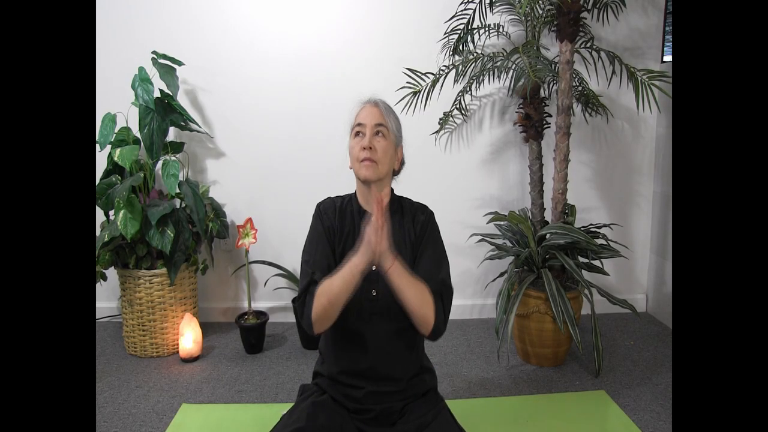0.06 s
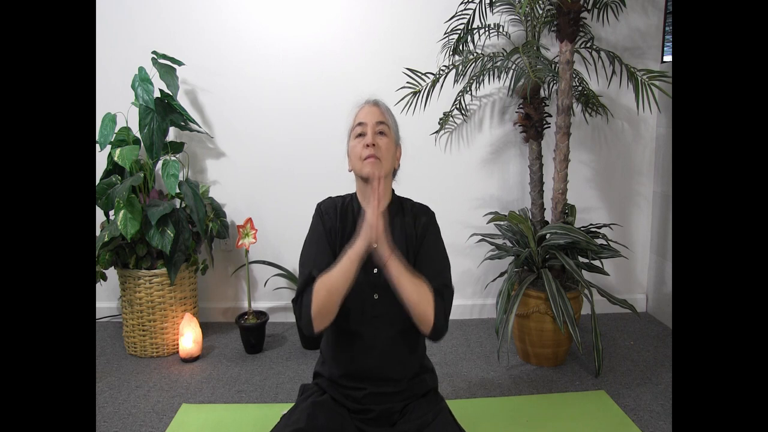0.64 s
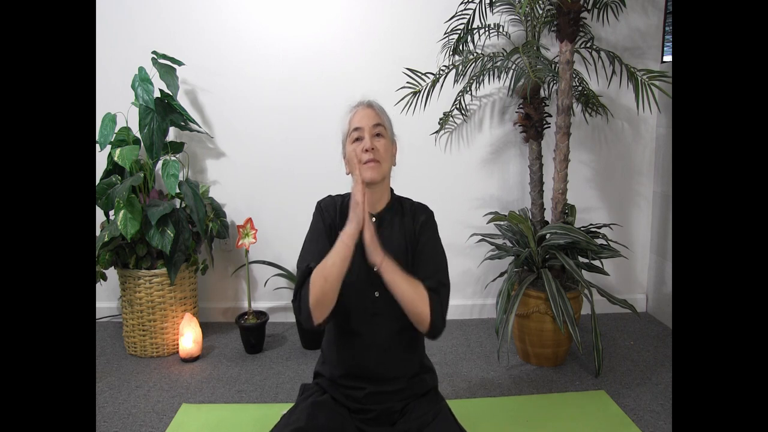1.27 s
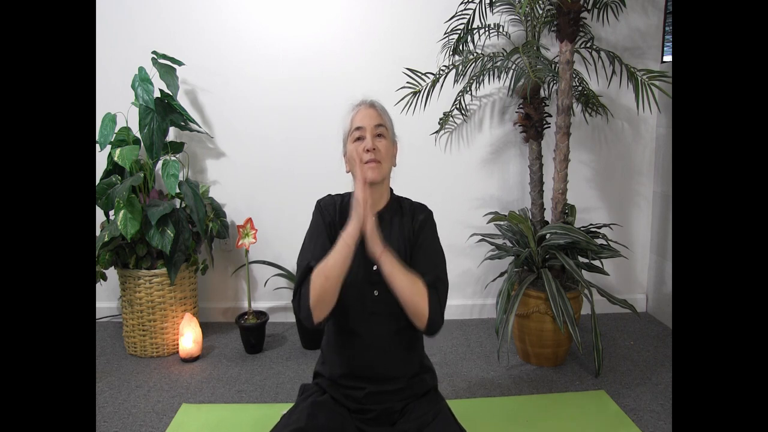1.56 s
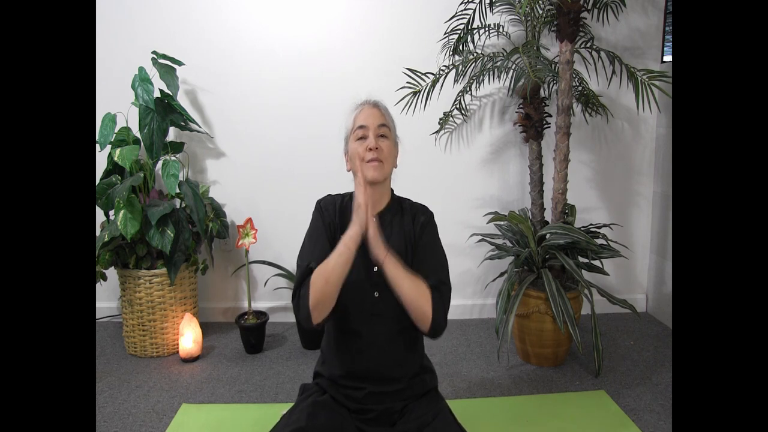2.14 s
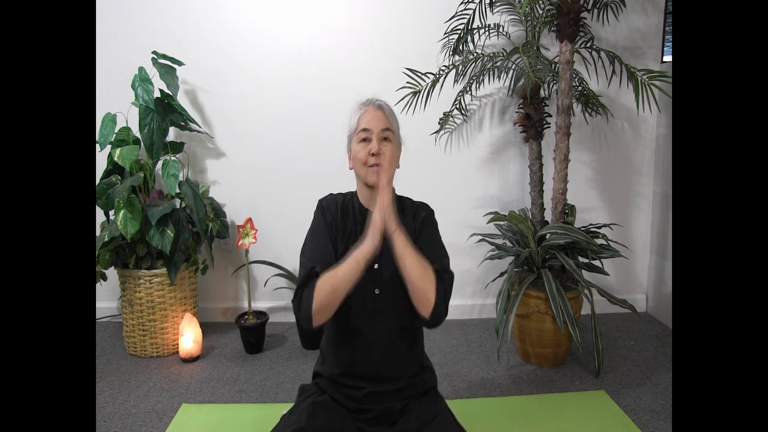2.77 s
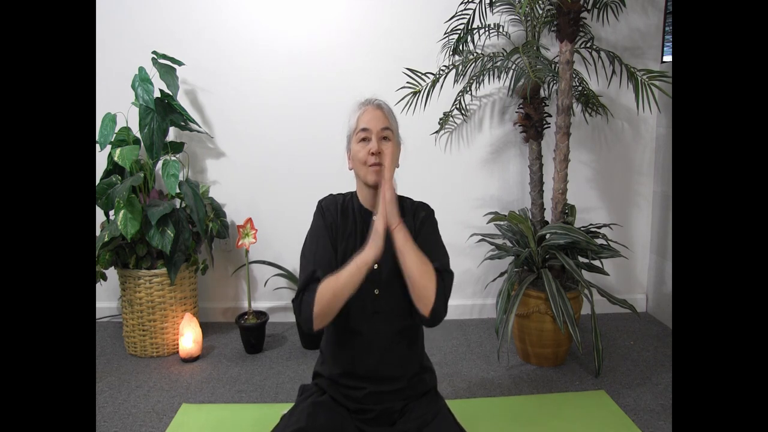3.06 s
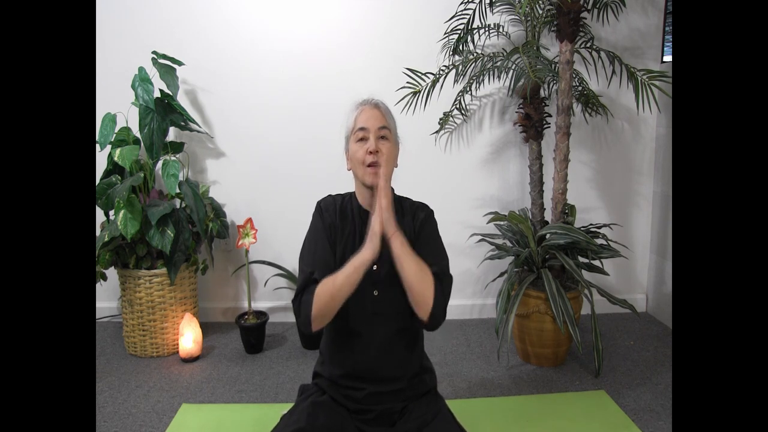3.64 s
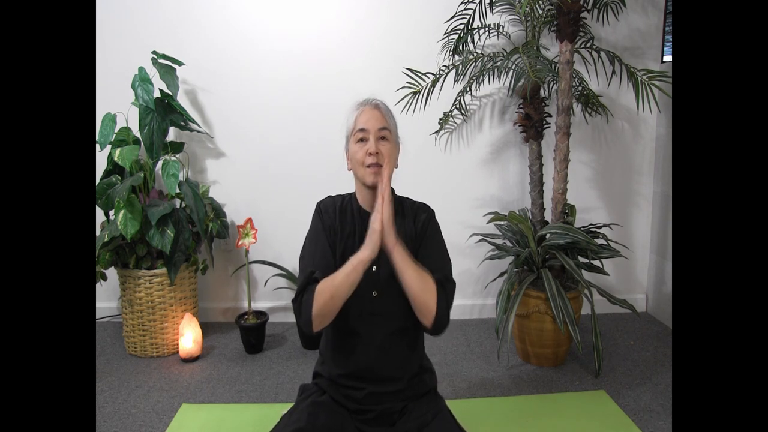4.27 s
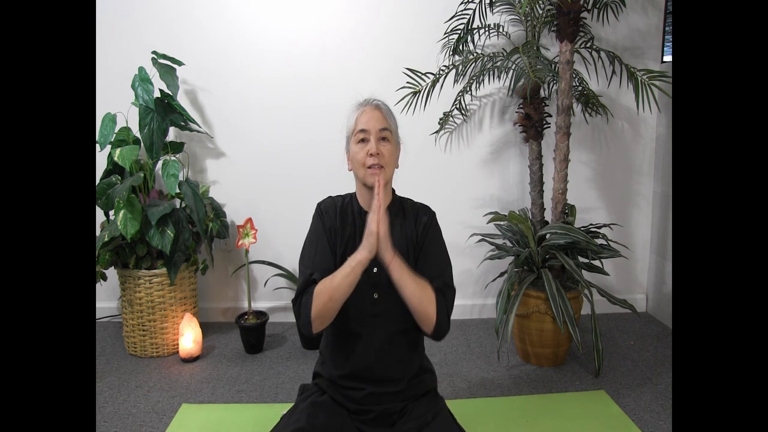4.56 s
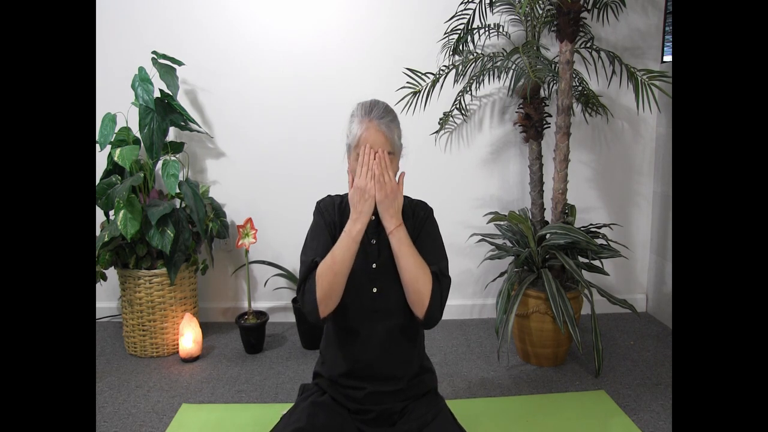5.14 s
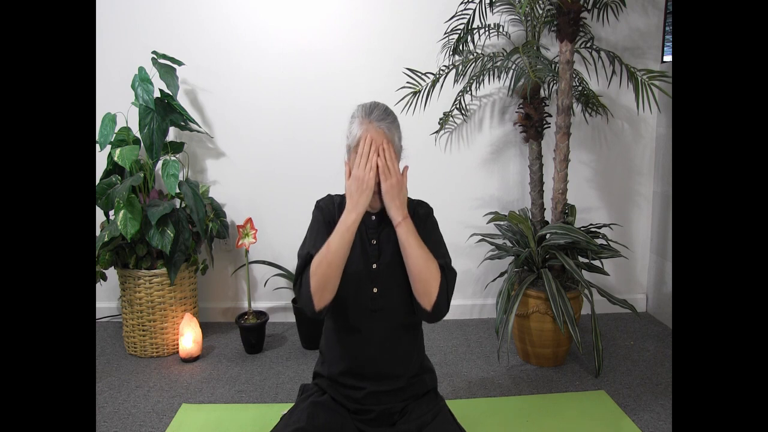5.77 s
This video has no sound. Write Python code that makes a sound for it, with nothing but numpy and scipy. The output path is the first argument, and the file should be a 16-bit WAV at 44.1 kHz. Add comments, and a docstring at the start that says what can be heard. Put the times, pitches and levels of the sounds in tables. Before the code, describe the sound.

Two bare palms rub briskly back and forth, making a fast, even, dry swishing of skin. Small pops of trapped air escape between the hands now and then. After nearly five seconds the rubbing eases and stops, and the hands brush very softly over the face a few times. The sound is close to the microphone in a small, quiet room with faint background noise.

```python
"""Two bare palms rub briskly back and forth, seven strokes a second, in a small quiet room.
Skin ridges catch and slip in a fine hiss; now and then the hollows of the palms meet and air pops out.
Near 4.7 s the hands come to rest, then brush softly over the face.
Faint room noise lies underneath throughout."""
import sys
import numpy as np
from scipy import signal
from scipy.fft import rfft, irfft, next_fast_len
from scipy.io import wavfile
from scipy.ndimage import uniform_filter1d, map_coordinates

SR = 44100
rng = np.random.default_rng(int(sys.argv[2]) if len(sys.argv) > 2 else 0)


def to_wav(s):
    """Save 16-bit WAV."""
    ch = np.atleast_2d(s).T  # columns
    pcm = np.round(np.clip(ch, -1, 1) * 32767)  # PCM
    wavfile.write(sys.argv[1], SR, pcm.astype(np.int16))


N = 255780


def rubbing(start_phase=0.344, asymmetry=-0.037, jitter_strokes=0.02, drag_half_s=0.035):
    """Palms swing to and fro, almost stopping at each turn; friction follows their speed."""
    # stroke pace: t/s, rate/(strokes/s)
    stroke_pace = [(0, 7.254), (1.3, 7.109), (3.6, 7.026), (4.6, 7.215)]
    # effort at full speed: t/s, relative level/dB
    effort = [(0, -39.5), (.3, -38.5), (1.9, -38.3), (2.8, -40), (3.25, -39.5), (4.1, -41), (4.25, -43.5),
              (4.38, -41), (4.69, -45), (4.76, -77)]
    # palm pressure: t/s, scrape gain/dB
    pressure = [(0, -2.5), (.4, -2), (1, -1.5), (1.7, -2), (2.3, -1), (3.3, -2), (4.3, -1), (4.8, -0.5)]
    # skin grip: t/s, stickiness (power of speed), creep left at the turns/dB
    grip = [(0, 1.1, -11), (1.9, 1.74, -13), (2.4, 3.7, -15.5), (3.9, 1.6, -14.5), (4.6, 5.8, -18.5)]
    # turns rolled through without stopping: t/s, relative level/dB
    drags = [(.365, -44.5), (1.205, -50), (2.05, -48), (2.765, -47), (3.89, -50)]
    # scrape spectrum through the palms: f/Hz, level/dB
    flesh = [(25, -38), (60, -10.5), (110, -3.5), (190, 0.5), (300, -2), (650, -1), (1000, -4.5),
             (1700, -2), (3000, -6.5), (6000, -11), (15000, -51.5)]
    pace_hz, = curves(stroke_pace)
    effort_db, = curves(effort)
    pressure_db, = curves(pressure)
    stickiness, creep_db = curves(grip)
    phase = start_phase + np.cumsum(pace_hz) / SR  # in strokes
    phase = phase + asymmetry * np.sin(np.pi * phase) + jitter_strokes * wobble(20)
    speed = np.abs(np.sin(np.pi * phase))
    creep = amp(creep_db + wobble(pace_hz.mean()))  # no two turns stop equally well
    drag_s, drag_db = np.transpose(drags)
    drag = swells(drag_s, drag_half_s) @ amp(drag_db)

    def envelope(rise_power, fall_power):
        """Gain is a power of speed: sticky skin holds longer, then breaks loose more suddenly."""
        drive = speed ** np.where(phase % 1 < 0.5, rise_power, fall_power)
        return np.hypot(amp(effort_db) * (creep + (1 - creep) * drive), drag)

    hiss_gain = envelope(stickiness, fall_power=1.68)
    scrape_gain = amp(pressure_db) * envelope(stickiness / 2, fall_power=0.93)  # breaks loose sooner
    return hiss_gain * hiss(speed, gain_db=-1) + scrape_gain * scrape(speed, flesh, gain_db=-5.5)


def hiss(speed, gain_db, waver_db=0.75):
    """Skin ridges slip past each other, more densely at speed; the grip wavers within a stroke."""
    # skin hiss spectrum: f/Hz, level/dB
    skin = [(200, -12.5), (1000, -7.5), (2500, -6.5), (4000, -1), (6700, -0.5), (9000, -3), (12500, -5.5),
            (15500, -10)]
    fine_slips = slips(rate_hz=16000 + 20000 * speed, scatter_db=1.5)
    fine = shifting_gaps(coloured(fine_slips, skin), depth_db=1.5)
    return amp(gain_db + waver_db * wobble(35)) * fine


def scrape(speed, spectrum, gain_db):
    """Pressure adds coarser slips that sound through the flesh."""
    coarse_slips = slips(rate_hz=2200 + 3500 * speed, scatter_db=2.0)
    return amp(gain_db) * shifting_gaps(coloured(coarse_slips, spectrum), depth_db=0.84)


def slips(rate_hz, scatter_db):
    """Tiny stick-slip releases of uneven size."""
    released = rng.random(N) < rate_hz / SR
    return unit(released * rng.standard_normal(N) * amp(scatter_db * rng.standard_normal(N)))


def shifting_gaps(x, depth_db):
    """Gaps between the hands change shape, so brief resonances come and go."""
    frames = signal.stft(x, nperseg=512)[2]
    ripple = uniform_filter1d(rng.standard_normal(frames.shape), size=5, axis=0)
    ripple = uniform_filter1d(ripple, size=9, axis=1)
    return signal.istft(frames * amp(depth_db * unit(ripple)), nperseg=512)[1][:N]


def air_pops(open_t60_s=0.0076, sealed_t60_s=0.063, flutter=0.1, snap_ratio=1.954):
    """A dull puff rings the pocket between the palms: a better seal rings longer and snaps less."""
    # air pockets: t/s, relative level/dB, resonance f/Hz, seal (0-1)
    pockets = [(0.134, -23.5, 1430, 0.4), (0.2452, -32.5, 1420, .2), (.4193, -15, 1995, 0.92),
               (0.5553, -26, 1880, .25), (0.6919, -25.5, 1750, 0.33), (.9755, -24, 1790, 0.25),
               (1.113, -28, 1500, 0.08), (1.2566, -22.5, 2080, 0.6), (1.5316, -20, 1853, 0.65),
               (1.6732, -25, 1580, 0.43), (1.815, -24, 1980, .2), (2.248, -28.5, 1650, 0.6),
               (2.381, -28.5, 2070, 0.55), (2.5225, -27.5, 1470, 0.8), (2.6604, -19, 2045, 1),
               (3.089, -25, 1810, 0.03), (3.2378, -21, 1720, 0.07), (3.796, -33.5, 1770, 0.93),
               (3.943, -28, 1540, 0.5), (4.0792, -22.5, 1985, 0.87), (4.392, -34, 1020, 0.3)]
    # escaping air spectrum: f/Hz, level/dB
    puff_spectrum = [(30, -44), (120, -23), (350, -2.5), (750, 10.5), (1600, 2.5), (3200, 4.5),
                     (6000, -20.5), (15000, -60)]
    out = np.zeros(N + SR)
    puff = impulse(puff_spectrum)
    t = np.arange(len(puff)) / SR
    attack = 1 - np.exp(-t / 0.00023)
    for start_s, level_db, hz, seal in pockets:
        # the pocket changes size as the hands slide, so its pitch wanders
        drift = map_coordinates(rng.standard_normal(64), [np.linspace(0, 60, len(t))])
        angle = 2 * np.pi * np.cumsum(hz * (1 + flutter * drift)) / SR
        ring_t60_s = open_t60_s * (sealed_t60_s / open_t60_s) ** seal
        ring = decay(t, start_db=-4.5, t60_s=ring_t60_s) * np.sin(angle)
        snap = decay(t, start_db=2.5 - 28 * seal, t60_s=0.008) * np.sin(snap_ratio * angle)
        rush = coloured(rng.standard_normal(len(t)), puff_spectrum)
        leak = decay(t, start_db=-11, t60_s=0.028) * rush
        pop = amp(-6) * puff + attack * (ring + snap + leak)
        out[round(start_s * SR):][:len(t)] += amp(level_db) * pop
    return out[:N]


def gap_whistles(half_width_hz=220):
    """A narrow gap between the hands briefly adds an airy band to the hiss."""
    # whistles: t/s, half length/s, f/Hz, level/dB
    whistles = [(0.147, 0.023, 6630, -42.5), (.445, .02, 8700, -51), (1.412, 0.015, 4870, -45),
                (2.96, .028, 6470, -57)]
    out = np.zeros(N)
    for centre_s, half_s, hz, level_db in whistles:
        band = filtered(rng.standard_normal(N), lambda f: 1 / (1 + ((f - hz) / half_width_hz) ** 2))
        out += amp(level_db) * swells(centre_s, half_s)[:, 0] * unit(band)
    return out


def brushing():
    """The palms part and pass lightly over the face, one soft swell of friction per pass."""
    # passes: t/s, half length/s, relative level/dB, scrape gain from pressure/dB
    brushes = [(4.82, 0.052, -61.5, -4), (5.3, .045, -70, 3), (5.364, 0.032, -58.5, 4.5),
               (5.494, .04, -68.5, -8), (5.661, .04, -56.5, -.5), (5.81, .04, -65, -8)]
    # scrape spectrum through the cheek: f/Hz, level/dB
    cheek = [(40, -17), (120, -5), (220, -1.5), (450, -4.5), (700, -0.5), (1000, -8), (1400, -3),
             (2700, -12), (6000, -24), (15000, -40)]
    centre_s, half_s, level_db, pressure_db = np.transpose(brushes)
    passes = swells(centre_s, half_s)
    speed = passes.max(axis=1)
    hiss_gain = passes @ amp(level_db)
    scrape_gain = passes @ amp(level_db + pressure_db)
    return hiss_gain * hiss(speed, gain_db=-2) + scrape_gain * scrape(speed, cheek, gain_db=-4)


def early_echoes(x, cutoff_hz=5000):
    """Chest, floor and walls throw back dulled copies."""
    # reflections: delay/s, gain/dB
    echoes = [(.0032, -22), (.0078, -9), (.0121, -7.5), (0.0217, -10.5)]
    return filtered(x, lambda hz: sum(amp(db) * np.exp(-2j * np.pi * hz * s) for s, db in echoes)
                    / (1 + 1j * hz / cutoff_hz))


def reverb(x, positions=12):
    """Dense early scatter and the room's tail, slightly different for each hand position."""
    # room decay: f/Hz, T60/s
    room_t60 = [(120, 0.34), (500, 0.7), (2000, 0.43), (6000, 0.22), (15000, 0.31)]
    # tail spectrum: f/Hz, level/dB
    room_colour = [(60, 1.5), (240, 3), (600, -3), (2000, -2), (6000, -3), (15000, -4.5)]
    out = np.zeros((2, N))
    for k in range(positions):
        hz, t, noise = signal.stft(rng.standard_normal((2, SR // 2)), SR, nperseg=256)
        fade = decay(t, along(room_colour, hz)[:, None], along(room_t60, hz)[:, None])
        scatter = (1 + decay(t, start_db=10, t60_s=0.019)) * (t > 0)
        tail = diffuse(signal.istft(noise * fade * scatter, SR, nperseg=256)[1])
        tail /= np.linalg.norm(tail[0])
        crossfade = np.maximum(1 - np.abs(np.linspace(0, positions - 1, N) - k), 0)
        out += signal.oaconvolve((x * crossfade)[None], tail, axes=1)[:, :N]
    return out


def standing_waves(x):
    """A few low notes build up between parallel surfaces."""
    # room modes: f/Hz, width/Hz, gain/dB
    modes = [(120, 10, -2), (238.5, 6, 4.5), (360.8, 9, 6), (577, 16, 3.5)]
    return filtered(x, lambda f: 1 + sum(amp(db) * 1j * f * width / (hz ** 2 - f ** 2 + 1j * f * width)
                                         for hz, width, db in modes))


def diffuse(pair):
    """Two unrelated signals become left and right of a sound that fills the room."""
    # room field: f/Hz, left-right correlation
    correlation = [(40, 0.12), (200, -0.12), (380, -0.44), (700, -0.49), (1800, 0.24), (4000, -0.055),
                   (8000, 0.0051), (14000, 0.66)]
    angle = lambda hz: np.arccos(np.clip(along(correlation, hz), -1, 1)) / 2
    mid, side = filtered(pair, lambda hz: np.array([np.cos(angle(hz)), np.sin(angle(hz))]))
    return np.array([mid + side, mid - side])


def room_tone(gain_db):
    """Faint steady background noise."""
    # background spectrum: f/Hz, level/dB
    air = [(15, -44), (25, -16), (240, -1), (495, -5), (582, -3.5), (970, -6.5), (4620, -13),
           (15500, -22.5)]
    return amp(gain_db) * coloured(diffuse(rng.standard_normal((2, N))), air)


def amp(db):
    """Decibels to gain."""
    return 10 ** (np.asarray(db) / 20)


def unit(x):
    """Scale to rms 1."""
    return x / np.sqrt(np.mean(x ** 2) + 1e-20)


def decay(t, start_db, t60_s):
    """Gain falling 60 dB per t60_s."""
    return amp(start_db - 60 * t / t60_s)


def along(points, hz):
    """Interpolate (f/Hz, value) rows on a log axis."""
    f, values = np.transpose(points)
    return np.interp(np.log(hz + 1), np.log(f + 1), values)


def curves(rows):
    """One value per sample for each column after t/s."""
    times_s, *columns = np.transpose(rows)
    return [np.interp(np.arange(N) / SR, times_s, column) for column in columns]


def swells(centre_s, half_s):
    """Gaussian bumps, one column each."""
    return np.exp(-((np.arange(N)[:, None] / SR - centre_s) / half_s) ** 2)


def wobble(rate_hz):
    """Smooth random curve, rate_hz knots a second."""
    knots = rng.standard_normal(int(N * rate_hz / SR) + 4)
    return map_coordinates(knots, [np.arange(N) * rate_hz / SR])


def filtered(x, response):
    """Apply a frequency response."""
    n = x.shape[-1]
    size = next_fast_len(n + SR // 4)
    return irfft(rfft(x, size) * response(np.fft.rfftfreq(size, 1 / SR)), size)[..., :n]


def coloured(x, spectrum):
    """Shape by (f/Hz, level/dB) rows; rms 1."""
    return unit(filtered(x, lambda hz: amp(along(spectrum, hz))))


def impulse(spectrum, size=4096):
    """Minimum-phase pulse of a given spectrum; peak 1."""
    magnitude = amp(along(spectrum, np.fft.rfftfreq(size, 1 / SR)))
    cepstrum = irfft(np.log(magnitude))
    pulse = irfft(np.exp(rfft(2 * cepstrum[:size // 2], size)))
    return pulse / np.abs(pulse).max()


def scene():
    """Hands close in front, the room around them."""
    skin = rubbing() + gap_whistles() + brushing()
    pops = air_pops()
    balance_db = [[0.2], [-0.2]]  # left, right
    direct = (skin + pops + early_echoes(pops)) * amp(balance_db)
    room = reverb(amp(-4.5) * skin + amp(-3) * pops) + room_tone(gain_db=-65)
    return direct + standing_waves(room)


def record(dry):
    """Brick-wall low-pass at 15.8 kHz."""
    return filtered(dry, lambda hz: hz < 15800)


dry = scene()
out = record(dry)
to_wav(out)
```